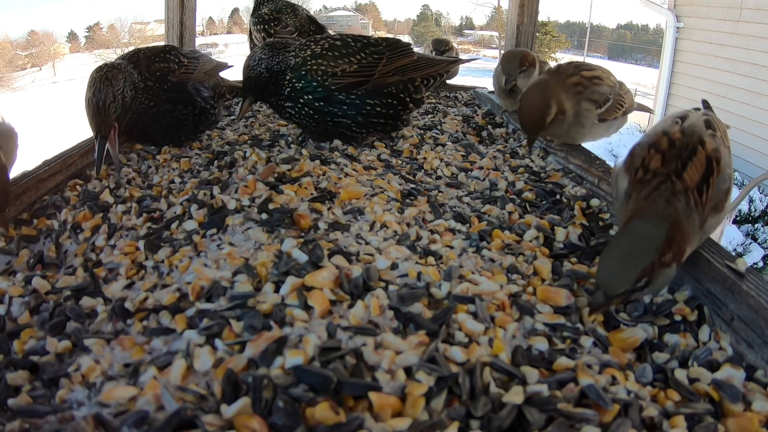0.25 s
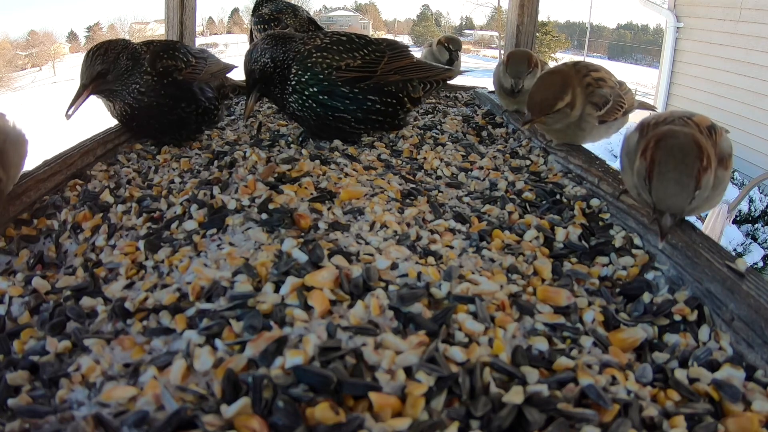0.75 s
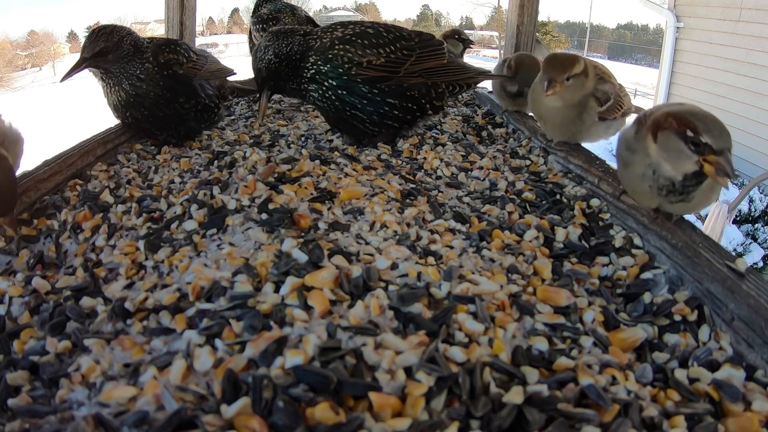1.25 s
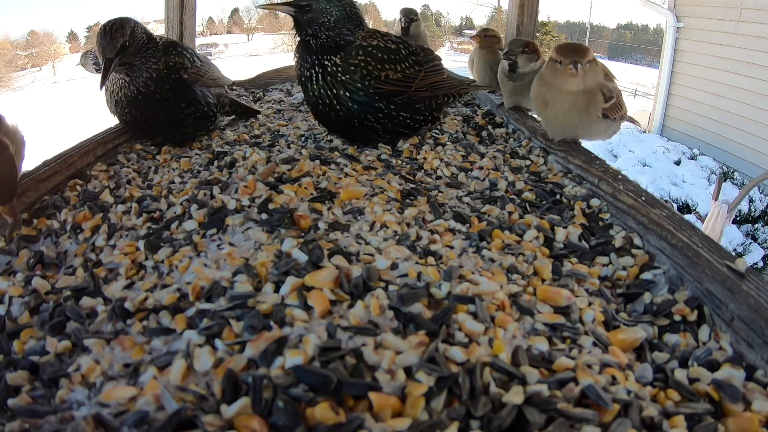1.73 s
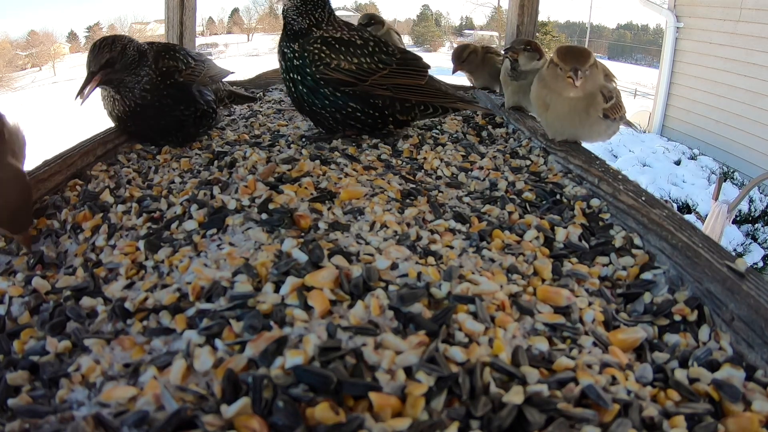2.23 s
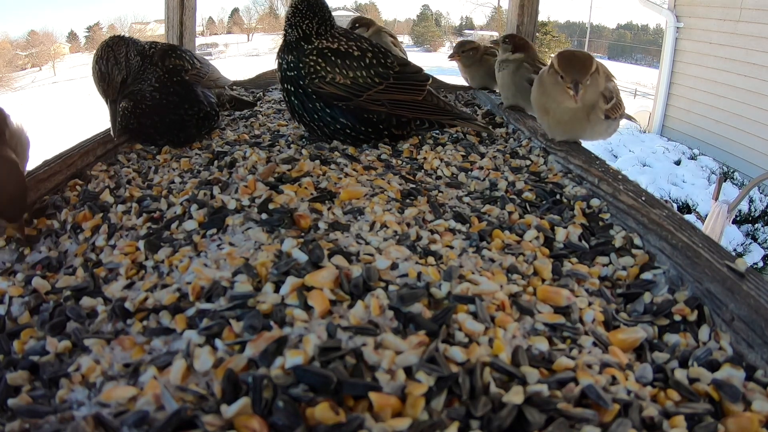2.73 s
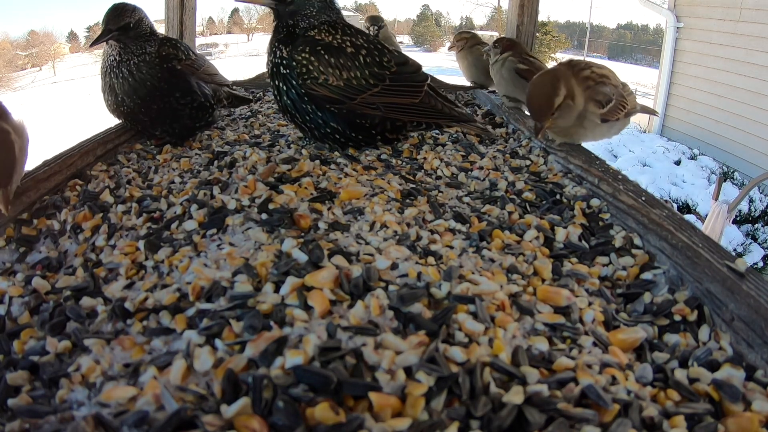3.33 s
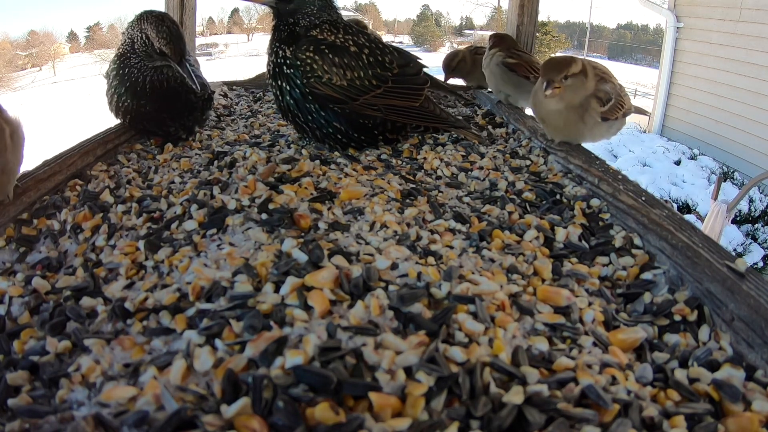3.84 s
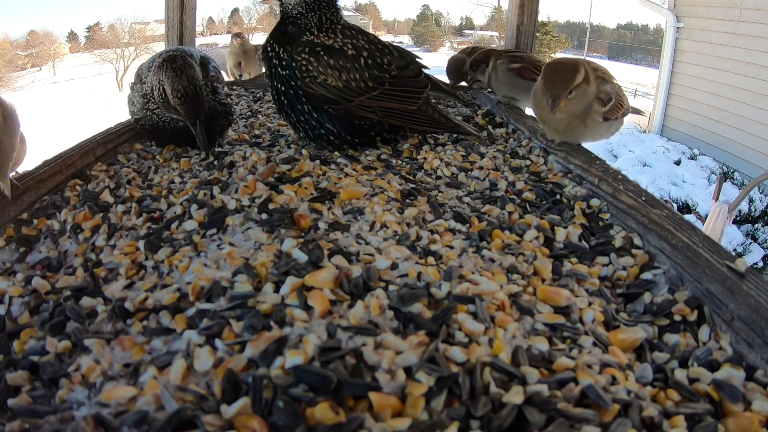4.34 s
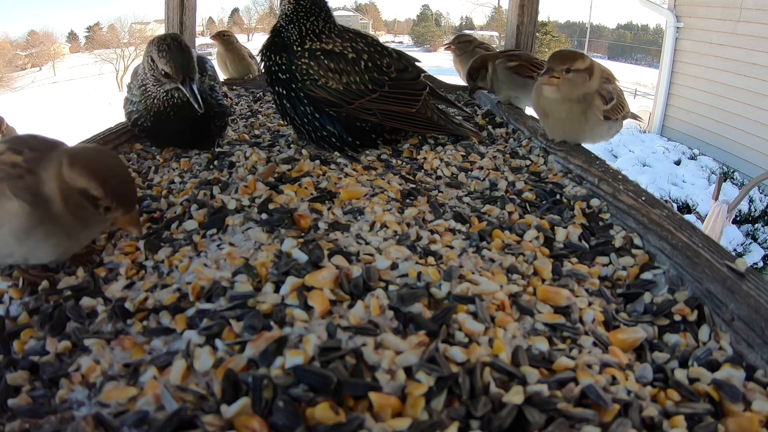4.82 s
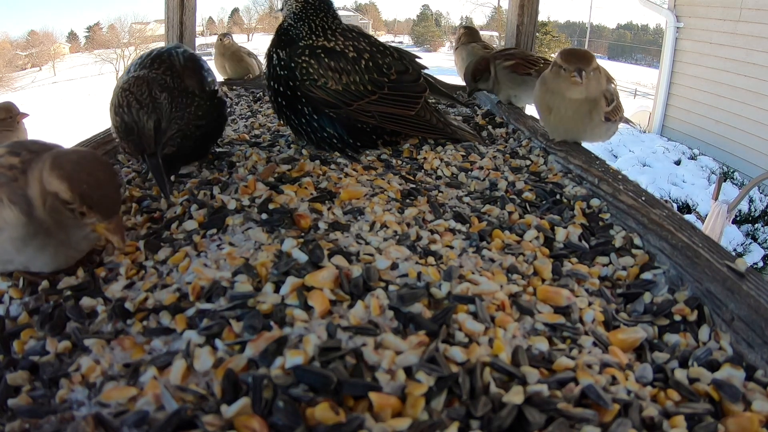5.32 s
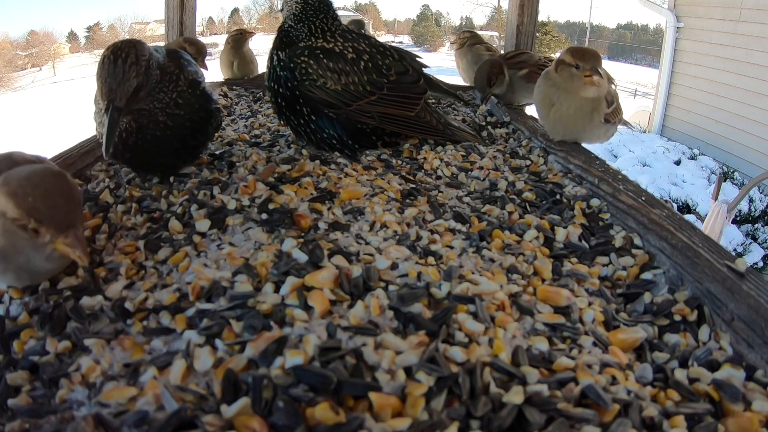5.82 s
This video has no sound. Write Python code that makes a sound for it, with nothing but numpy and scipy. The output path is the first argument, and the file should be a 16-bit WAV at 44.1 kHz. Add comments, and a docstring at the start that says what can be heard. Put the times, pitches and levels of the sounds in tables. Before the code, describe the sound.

Close, dry sound of birds at a feeder: hollow wood taps, little brittle cracks and seeds shifting in clumps. Low wing puffs flutter on the right at the start, a strong cluster of bumps follows before two seconds, then calmer pecking. Brief thin chirps and a small whistle stay quiet behind. Light wind rumbles low, and after five seconds a hard snap precedes a deep puff of air at the right microphone.

```python
"""A wooden seed tray outdoors, heard through two microphones mounted on it while small birds feed.
Hops and pecks excite the damped modes of the tray, which shake the microphones mostly in opposite sense.
Husks snap as resonant noise bursts, and sliding seed rustles as clumped ticks over filtered noise. Sparrows
chirp nearby as gliding sines, with hoarse noise notes and faint hiss behind. Light wind and a few puffs of
wing air add low-frequency pressure swings, mainly at the right microphone."""
import sys
import numpy as np
from scipy import signal
from scipy.fft import rfft, irfft, next_fast_len
from scipy.io import wavfile
from scipy.ndimage import uniform_filter1d, map_coordinates

SR = 44100
rng = np.random.default_rng(int(sys.argv[2]) if len(sys.argv) > 2 else 0)


def transcribe(signal):
    """Save signal, clipped to [-1, 1], as a 16-bit WAV file at the path in sys.argv[1]."""
    frames = np.atleast_2d(signal).T
    limited = np.clip(frames, -1, 1)
    pcm = np.round(limited * 32767).astype(np.int16)
    wavfile.write(sys.argv[1], SR, pcm)


N = 267687  # samples


def amp(db):
    """Decibel law: a level in dB becomes an amplitude factor."""
    return 10 ** (np.asarray(db) / 20)


def unit(x):
    """Energy normalization: scale to rms 1."""
    return x / np.sqrt(np.mean(x ** 2) + 1e-20)


def along(points, hz):
    """Logarithmic pitch scale: interpolate (Hz, value) points evenly in log frequency."""
    f, v = np.transpose(points)
    return np.interp(np.log(hz + 1), np.log(f + 1), v)


def curves(rows):
    """Piecewise-linear envelopes: one value per sample for each column after the time."""
    s, *cols = np.transpose(rows)
    return [np.interp(np.arange(N) / SR, s, c) for c in cols]


def wobble(rate, count=N):
    """Slow random modulation: a smooth curve through `rate` random knots a second."""
    knots = rng.standard_normal(int(count * rate / SR) + 4)
    return map_coordinates(knots, [np.arange(count) * rate / SR])


def filtered(x, response):
    """Linear filtering: multiply the spectrum of x by a complex response of frequency."""
    count = x.shape[-1]
    padded = next_fast_len(count + min(count // 2, 8192), True)  # room for the ringing
    spectrum = rfft(x, padded) * response(np.fft.rfftfreq(padded, 1 / SR))
    return irfft(spectrum, padded)[..., :count]


def resonance(hz, centre_hz, width_hz):
    """Damped simple resonator: complex response with gain 1 at its centre."""
    return 1j * hz * width_hz / (centre_hz ** 2 - hz ** 2 + 1j * hz * width_hz)


def sides(pan_db):
    """Interaural level difference: left and right gains, left over right by pan_db."""
    return amp(np.array([pan_db / 2, -pan_db / 2]))


# Correlation of diffuse sound between the microphones; values are limited to -1..1 when used.
# Columns: pitch_hz [Hz], left_right_likeness [correlation]
LIKENESS = [(900, -1.12), (1300, -0.4), (1900, -0.35), (2700, 0.33), (4000, 0.77), (5700, 0.12),
            (7000, -0.031), (9000, 0.033)]


def spread(pair, spectrum, patchy_db):
    """Partial coherence: mix two unrelated signals into a left and a right of rms 1, patchy in colour."""
    z = signal.stft(pair, nperseg=128)[2]
    field = uniform_filter1d(rng.standard_normal(z.shape[1:]), size=3, axis=0)  # over frequency
    field = uniform_filter1d(field, size=6, axis=1)  # over time
    pair = signal.istft(z * amp(patchy_db * unit(field)), nperseg=128)[1][:, :N]

    def mid_side(hz):
        turn = np.arccos(np.clip(along(LIKENESS, hz), -1, 1)) / 2
        return amp(along(spectrum, hz)) * [np.cos(turn), np.sin(turn)]
    mid, side = filtered(pair, mid_side)
    return unit(np.array([mid + side, mid - side]))


def add(out, s, sound):
    """Superposition: add a stereo sound from time s in seconds."""
    i = max(round(s * SR), 0)
    out[:, i:i + sound.shape[1]] += sound[:, :N - i]


# Spectrum of the steady outdoor hiss. Columns: pitch_hz [Hz], relative_density_db [dB per Hz]
AIR_SPECTRUM = [(300, -23.5), (800, 3), (1300, -16.5), (3000, -9), (7000, -2), (9000, -12.5),
                (12000, -19.5), (16000, -43)]


def air():
    """Stationary noise: the quiet hiss under everything."""
    return amp(-75.5) * spread(rng.standard_normal((2, N)), AIR_SPECTRUM, patchy_db=-2.0)


# Course of the wind. Columns: start_s [s], tray_sway_level_db [dB], buffet_level_db [dB]
WIND_COURSE = [(0.0, -64, -34), (0.17, -48, -38), (0.59, -34.5, -41), (0.86, -48, -46), (1.11, -44, -52),
               (1.5, -37.5, -39.5), (1.72, -31.5, -34), (2.13, -40, -53.5), (2.38, -59, -50.5),
               (2.47, -46.5, -43), (3.09, -72, -57), (3.72, -77, -61.5), (3.87, -40.5, -51.5),
               (4.41, -65.5, -48), (4.75, -39, -49), (5.26, -46.5, -45.5), (5.38, -35.5, -42.5),
               (5.82, -52, -48), (5.9, -41.5, -42.5), (6.07, -32.5, -53)]
# Spectrum of the buffeting. Columns: pitch_hz [Hz], relative_density_db [dB per Hz]
BUFFET_SPECTRUM = [(15, -28), (30, -18), (45, -6), (100, -8), (150, -13.5), (250, -15), (500, -35),
                   (900, -120)]
# Puffs of air. Columns: middle_s [s], right_peak_db [dB], pitch_hz at the middle [Hz], length_s [s]
AIR_PUFFS = [(0.022, -33.5, 110, 0.04), (0.136, -26, 100, 0.016), (0.247, -27.5, 118, 0.013),
             (0.348, -29, 100, 0.016), (0.394, -25, 90, 0.016), (0.181, -20, 83, 0.038),
             (0.561, -29, 79, 0.027), (2.493, -28.5, 84, 0.023), (4.576, -29, 90, 0.0084),
             (4.827, -27, 72.4, 0.06), (5.323, -20, 128, 0.0073), (5.351, -16, 98.5, 0.019),
             (5.384, -14.5, 190, 0.0044), (5.391, -8.5, 96, 0.014), (5.4, -23.5, 176, 0.038),
             (5.981, -29.5, 78, 0.028)]
PUFF_LEFT_DB = -19  # left relative to right


def wind():
    """Turbulent pressure: buffeting differs from port to port; a puff is a few cycles of low pressure swing."""
    lumps = amp(5.3 * np.array([wobble(18), wobble(18)]))
    buffet = unit(filtered(lumps * rng.standard_normal((2, N)), lambda f: amp(along(BUFFET_SPECTRUM, f))))
    out = amp(curves(WIND_COURSE)[1]) * sides(-4.5)[:, None] * buffet
    t = np.arange(-SR // 10, SR // 10) / SR
    for s, db, hz, length in AIR_PUFFS:
        swell = amp(db) * np.exp(-(2 * t / length) ** 2)
        swing = -np.cos(2 * np.pi * hz * t * (1 - 6 * t))  # falling pitch
        add(out, s - .1, swell * swing * amp([[PUFF_LEFT_DB], [0]]))
    return out


# Faint notes from farther birds. Columns: middle_s [s], pitch_hz [Hz], level_db [dB], length_s [s]
HOARSE_NOTES = [(1.836, 2280, -56, 0.043), (1.905, 2170, -59.5, 0.072), (1.93, 2200, -64, 0.02),
                (2.63, 5700, -54, 0.018), (3.023, 2000, -72.5, 0.42), (5.317, 1670, -71.5, 0.2)]


def hoarse():
    """Source-filter voice: breathy notes made of noise in one throat resonance."""
    out, t = np.zeros((2, N)), np.arange(-SR // 5, SR // 5) / SR
    for s, hz, db, length in HOARSE_NOTES:
        broken = amp(1.7 * wobble(90, count=len(t)))
        breath = rng.standard_normal(len(t))
        voice = unit(broken * filtered(breath, lambda f: resonance(f, hz, 500) ** 2))
        swell = np.exp(-(2 * t / length) ** 2)
        add(out, s - .2, amp(db) * swell * voice * np.ones((2, 1)))
    return out


# Sparrow chirps, one row a voice; a sparrow sings two lines at once.
# Columns: level_db [dB], glide as a list of (start_s [s], pitch_hz [Hz])
CHIRP_VOICES = [(-57.5, [(1.26, 6260), (1.272, 6350), (1.296, 6150), (1.308, 5900), (1.318, 5780),
                (1.328, 5630)]), (-63, [(3.2, 5250), (3.207, 5400), (3.24, 5950), (3.25, 5400),
                (3.262, 5060), (3.287, 4380), (3.306, 3700), (3.322, 3550), (3.338, 2830)]),
                (-63, [(3.2, 4850), (3.21, 4950), (3.24, 4850), (3.254, 4880)]), (-63.5, [(5.58, 5300),
                (5.592, 6150), (5.602, 6360), (5.63, 5800), (5.655, 5200)]), (-64.5, [(5.579, 4950),
                (5.593, 5630), (5.625, 5250), (5.645, 4900), (5.675, 4560), (5.688, 4350), (5.7, 3800)])]
# Thin low whistles. Columns: level_db [dB], glide as a list of (start_s [s], pitch_hz [Hz])
LOW_WHISTLES = [(-58.5, [(1.642, 2120), (1.662, 2510), (1.7, 2625), (1.748, 2720), (1.756, 2555),
                (1.785, 2620), (1.812, 2560)]), (-68, [(2.488, 920), (2.5, 980), (2.525, 960)])]
CALL_ATTACK_S, CALL_RELEASE_S, CALL_DB_PER_OCTAVE = 0.0036, 0.0091, 7


def calls():
    """Frequency modulation: slightly unsteady sines that fade as they fall, with a short outdoor echo."""
    out, t = np.zeros((2, N)), np.arange(SR // 4) / SR
    # voice, pan dB, level warble dB, relative pitch jitter
    voices = ([(call, -5, 4.5, .017) for call in CHIRP_VOICES]
              + [(call, -2, 2.5, .004) for call in LOW_WHISTLES])
    for (db, rows), pan_db, warble_db, jitter in voices:
        s, pitch = np.transpose(rows)
        hz = np.interp(t + s[0], s, pitch)
        time_left = s[-1] - s[0] - t
        gate = np.clip(np.minimum(t / CALL_ATTACK_S, time_left / CALL_RELEASE_S), 0, 1)
        unsteady_hz = hz * (1 + jitter * wobble(245, count=len(t)))
        tone = np.sqrt(2) * np.sin(2 * np.pi * np.cumsum(unsteady_hz) / SR)
        level_db = db + CALL_DB_PER_OCTAVE * np.log2(hz / pitch.max()) + warble_db * wobble(172, count=len(t))
        add(out, s[0], sides(pan_db)[:, None] * amp(level_db) * gate * tone)
    tail = rng.standard_normal((2, len(t))) * amp(-60 * t / 0.15)  # diffuse echo, 0.15 s to fall 60 dB
    echo = signal.oaconvolve(out, tail / np.linalg.norm(tail[0]), axes=1)[:, :N]
    return out + amp(-1.5) * echo


# Course of the sliding seed. Columns: start_s [s], fine_level_db [dB], coarse_level_db [dB]
SLIDING = [(0.0, -65.5, -69), (0.59, -61.5, -67), (1.11, -68.5, -74), (1.43, -60, -64.5),
           (1.81, -56.5, -59), (2.06, -66, -71.5), (4.31, -62, -68), (4.92, -68.5, -78.5),
           (6.07, -66, -69.5)]
# Beaks sweep through the seed. Columns: middle_s [s], fine_level_db [dB], coarse_level_db [dB], length_s [s]
BEAK_SWEEPS = [(0.217, -63, -65, 0.05), (1.298, -57.5, -66, 0.12), (1.72, -57, -59, 0.063),
               (1.877, -77, -65, 0.11), (2.164, -55, -61, 0.013), (2.666, -56.5, -73, 0.082),
               (2.94, -81, -75, 0.038), (3.186, -64, -69, 0.1), (3.619, -57.5, -65, 0.053),
               (4.32, -79, -66.5, 0.17), (5.24, -71, -71.5, 0.19), (5.79, -55.5, -66, 0.12)]
# Spectra of fine and coarse rustle. Columns: pitch_hz [Hz], relative_density_db [dB per Hz]
FINE_SPECTRUM = [(3000, -14), (4500, -11), (5800, -1.5), (7000, 2.5), (7600, -0.5), (8300, -17),
                 (10000, -25), (12500, -34), (14500, -41), (16500, -53)]
COARSE_SPECTRUM = [(500, -23), (900, 3.5), (1400, 3.5), (2500, -1.5), (4000, -1), (5500, -7), (9000, -27.5)]
THROWN_S, THROWN_FINE_DB = 0.009, -16  # spray of seed after a hop: time to its peak, fine over coarse


def rustle():
    """Granular friction: clumps of tiny ticks over a soft hiss; every sweep or hop is a swell of it."""
    t = np.arange(N) / SR
    level = amp(curves(SLIDING))
    for s, *_, seed_db in TRAY_HOPS:  # the spray starts at once and thins out
        near = slice(round(s * SR), round((s + .15) * SR))
        age = (t[near] - s) / THROWN_S
        level[:, near] += amp([[seed_db + THROWN_FINE_DB], [seed_db]]) * np.e * age * np.exp(-age)
    for s, fine_db, coarse_db, length in BEAK_SWEEPS:
        near = slice(max(round((s - 2 * length) * SR), 0), round((s + 2 * length) * SR))
        level[:, near] += amp([[fine_db], [coarse_db]]) * np.exp(-(2 * (t[near] - s) / length) ** 2)
    clump = wobble(45)  # shared by fine and coarse

    def grainy(rate, tick_db, clump_db):
        """Shot noise: random ticks, `rate` a second, swell a hiss."""
        tick_level_db = tick_db + 3.0 * np.minimum(rng.exponential(size=N), 2.6)
        ticks = (rng.random(N) < rate / SR) * amp(tick_level_db)
        ticks = signal.lfilter([1], [1, -np.exp(-1 / (0.0015 * SR))], ticks)  # decay constant 1.5 ms
        clumps = amp(clump_db * clump + 1.65 * wobble(70))
        return rng.standard_normal((2, N)) * (1 + ticks) * clumps
    fine = spread(grainy(rate=150, tick_db=1.5, clump_db=2.0), FINE_SPECTRUM, patchy_db=2.0)
    coarse = spread(grainy(rate=150, tick_db=-14.5, clump_db=2.2), COARSE_SPECTRUM, patchy_db=3.5)
    return level[0] * sides(0.39)[:, None] * fine + level[1] * coarse


# Snapping husks. Columns: start_s [s], peak_level_db before panning [dB], husk_pitch_hz [Hz],
# husk_ring_over_crack_db [dB], crumble_t60_s [s]
HUSK_SNAPS = [(0.0939, -40.5, 1480, -4, 0.045), (0.124, -40.5, 2920, -7, 0.027),
              (0.167, -55, 3000, -14, .01), (0.2174, -47, 2640, -20, 0.019), (0.242, -46, 3150, 8, 0.02),
              (0.4077, -34, 1960, -2.5, 0.031), (0.4399, -31.5, 3520, -10, 0.017),
              (0.457, -44, 2120, -2, 0.041), (0.488, -40, 1390, -9.5, 0.048),
              (0.5201, -35.5, 3670, -5.5, 0.033), (0.606, -44.5, 2240, -1, 0.047),
              (0.645, -38, 4060, 8, 0.078), (0.647, -48.5, 1670, -7, .05), (0.684, -48, 1960, -4, 0.035),
              (0.748, -45, 3000, -7, 0.011), (0.838, -38, 3520, -8.5, 0.038),
              (0.906, -39.5, 4180, -14, 0.069), (1.037, -49, 1870, 4, 0.016),
              (1.068, -51.5, 4300, -5, 0.024), (1.146, -53.5, 4000, -23, 0.014),
              (1.173, -45.5, 2880, 1, 0.021), (1.199, -45, 3950, -25, 0.029),
              (1.2139, -32.5, 3960, -14.5, 0.016), (1.229, -22, 4170, -6, 0.014),
              (1.246, -27, 4740, -4, 0.016), (1.3355, -44, 3300, -18, 0.018), (1.452, -64, 3500, -18, .03),
              (1.486, -33, 3500, -18, 0.0072), (1.562, -48, 2300, 4, 0.037), (1.594, -41, 2190, 12, 0.037),
              (1.609, -37.5, 1570, 2, 0.035), (1.641, -33, 2380, -4, 0.055), (1.685, -40, 2000, -11, 0.024),
              (1.697, -45, 2000, -18, 0.013), (1.707, -30, 1990, -14.5, 0.012),
              (1.724, -32.5, 2600, -16, 0.014), (1.738, -34.5, 1790, 5, 0.07),
              (1.8387, -44, 2280, 10, 0.053), (1.97, -36.5, 2260, -9, 0.019), (1.9929, -35, 2090, 4, 0.017),
              (2.129, -57, 3500, -19, .015), (2.151, -40, 3770, -10.5, 0.036),
              (2.2374, -37, 3730, -7.5, 0.02), (2.299, -41, 3260, -11, 0.017),
              (2.317, -49, 3300, -10, .015), (2.331, -51, 3300, -8, .015), (2.4334, -39.5, 3650, -2, 0.026),
              (2.452, -54, 3500, -20, 0.014), (2.497, -37, 4000, -4, 0.0099),
              (2.523, -33.5, 1820, -11, 0.025), (2.559, -47, 1700, -5, .02), (2.665, -43.5, 2500, 3, 0.021),
              (2.6906, -37, 3170, 1, 0.015), (2.78, -42, 4200, -10, 0.011), (2.885, -46.5, 3200, 1, 0.03),
              (2.8944, -42.5, 1330, 10, 0.021), (2.9324, -45, 2320, 5, 0.04),
              (3.017, -49.5, 3500, -20, 0.022), (3.085, -25, 3600, -8.5, 0.011),
              (3.3762, -42, 2490, -22, 0.016), (3.488, -49, 3000, -25, 0.022),
              (3.558, -50.5, 2500, -4, .025), (3.588, -49, 3000, -12, 0.013),
              (3.629, -40, 2360, -18, 0.039), (3.68, -51, 3500, -27, 0.012), (3.7748, -44, 1370, -8, 0.02),
              (3.83, -37.5, 1880, -13, 0.027), (3.85, -44, 1690, -2, .06), (3.878, -36, 3450, -5, 0.03),
              (3.9691, -37, 3660, -5, 0.014), (4.161, -49.5, 3000, -6.5, 0.032),
              (4.304, -48, 2970, 0, 0.029), (4.35, -46, 2920, -1, 0.054), (4.4, -34.5, 3100, -16, 0.022),
              (4.475, -41.5, 1950, 0, 0.075), (4.529, -54, 3000, -22, .02), (4.641, -49, 3000, -26, 0.015),
              (4.662, -44, 2760, -8, 0.023), (4.6895, -43.5, 2860, -28, 0.018),
              (4.743, -49, 3000, -23, 0.016), (4.761, -48, 3700, 0, 0.056), (4.846, -56, 3500, 13, 0.02),
              (4.895, -38, 3650, -14, 0.012), (4.9395, -41.5, 2450, -5, 0.023),
              (5.025, -52, 3500, -15, 0.011), (5.102, -34.5, 3580, -11.5, 0.012),
              (5.254, -44, 5050, -3, .01), (5.2536, -21, 2670, -8, 0.018), (5.3737, -49.5, 1540, -22, .015),
              (5.43, -56, 2200, -26, .015), (5.63, -59, 3560, -4, 0.013), (5.696, -38, 3810, -19, 0.011),
              (5.7128, -46.5, 3600, 2, .02), (5.739, -31, 4080, -14, 0.0047), (5.801, -42, 2110, 8, 0.074),
              (5.821, -40, 2720, -9, 0.022), (5.903, -46.5, 2700, -19, 0.023), (5.921, -48, 3600, 8, .015),
              (5.9436, -50, 2910, -16, 0.033), (5.959, -29.5, 3730, -9, 0.013),
              (6.041, -56, 2120, -22, 0.016), (6.059, -39.5, 1670, -9, 0.048)]
# Cavity before the microphones. Columns: pitch_hz [Hz], width_hz of one resonator [Hz], level_db [dB]
PORT_CAVITY = [(7006, 545, -3.5), (6450, 1570, 1)]
HUSK_Q, SNAP_TOP_DB, SNAP_LEFT_DB = 2.5, -25, 2  # husk resonator sharpness, level near 11 kHz, left over right
SNAP_PAN_SCATTER_DB, SNAP_LAG_S = 2, .00004  # husks lie left and right of the ports
CRUMBLE_DB, CRUMBLE_LUMPY_DB, BROAD_DB = -8, 4.5, -7  # tail under the crack, its unevenness, broad husk shoulder


def snaps():
    """Impulsive fracture: a sharp crack with a short noisy tail rings in the husk and in the port cavity."""
    out, t = np.zeros((2, N)), np.arange(SR // 16) / SR

    def port(f):
        return sum(amp(db) * resonance(f, hz, width) ** 2 for hz, width, db in PORT_CAVITY)
    for s, db, husk_hz, husk_db, t60 in HUSK_SNAPS:
        shared, *own = rng.standard_normal((3, len(t)))
        lumpy_db = CRUMBLE_LUMPY_DB * wobble(580, count=len(t))
        crumble = amp(CRUMBLE_DB + lumpy_db - 60 * t / np.clip(t60, .004, .09))
        env = amp(-60 * t / 0.0048) + crumble + 0.013 * amp(-60 * t / 0.21)  # crack, crumble, faint long tail
        burst = env * (1 - np.exp(-t / 0.00054))
        place = rng.standard_normal()  # positive lies to the left

        def colour(f):
            husk = amp(husk_db) * resonance(f, husk_hz, husk_hz / HUSK_Q) ** 2
            broad = amp(husk_db + BROAD_DB) * resonance(f, 0.68 * husk_hz, 0.72 * husk_hz) ** 2
            top = amp(SNAP_TOP_DB) * resonance(f, 10470, 12000) ** 2
            return (port(f) + husk + broad + top) / (1 + (f / 13500) ** 12)

        def lag(f):
            return np.exp(1j * np.pi * f * SNAP_LAG_S * place * np.array([[1], [-1]]))
        # the nearer port hears the shared crack first; part of the sound reaches each port in its own way
        crack = (filtered(burst * shared, lambda f: colour(f) * lag(f))
                 + filtered(burst * np.array(own), lambda f: colour(f) * 0.56))
        gains = amp(db) * sides(SNAP_LEFT_DB + SNAP_PAN_SCATTER_DB * place)[:, None]
        add(out, s, gains * crack / np.abs(crack.mean(0)).max())
    return out


# Tray modes, lowest first. Columns: pitch_hz [Hz], t60_s [s] (hops ring for 0.54 of it),
# right_level_db [dB], left_over_right_db [dB], left_lead_rad [rad]
TRAY_MODES = [(46.86, 0.56, -2, -11, -1), (110, 0.048, -21.5, -30, 6.5), (157.2, 0.2, 1.5, -3, 3.5),
              (201.5, 0.17, 1.5, -6, 3.5), (258, 0.35, -3.5, -6.5, 4), (290, 0.078, -7.5, 5.5, -0.33),
              (331.2, 0.19, -7, -2.5, -1.5), (394, 0.13, -6.5, -10, 3.5), (471.6, 0.11, -4.5, -5.5, 3.5),
              (522, 0.1, -11, -0.5, 3.5), (637, 0.033, -8, -8.5, 3.5), (760.6, 0.032, -7.5, -1.5, 4),
              (858, 0.15, -14, 1, 3.5), (1035, 0.042, -17.5, -1, 3), (1310, 0.036, -6.5, -4.5, 3),
              (1660, 0.036, -13.5, 0, 1)]
# Hops and pecks. Columns: start_s [s], peak_level_db [dB], most_ringing_pitch_hz [Hz], hardness_db [dB],
# thrown_seed_level_db of the coarse part [dB]
TRAY_HOPS = [(0.096, -25.5, 394, 14, -53.5), (0.24, -36, 266, 19, -85), (0.41, -23.5, 352, 10, -75),
             (0.468, -35, 194, 12, -56), (0.647, -24.5, 345, 10, -66), (0.69, -19.5, 362, 0.5, -85),
             (0.841, -30, 288, 18.5, -60), (0.88, -25.5, 346, 8, -74), (1.158, -38.5, 254, -6, -65.5),
             (1.189, -32, 366, 12, -66), (1.379, -32.5, 194, 15, -85), (1.511, -22, 254, 2, -58.5),
             (1.598, -19, 340, 22, -56.5), (1.649, -17.5, 250, 0, -65), (1.696, -12.5, 201, 2.5, -59),
             (1.729, -22, 199, 9, -62.5), (1.947, -24, 250, 11.5, -58), (1.998, -17, 290, 9.5, -58.5),
             (2.345, -34, 253, 15, -87), (2.433, -28.5, 253, 8.5, -85), (2.518, -42, 328, 22, -80),
             (2.889, -30.5, 369, 11, -61), (3, -32, 248, -10, -79), (3.124, -30.5, 252, 4, -86),
             (3.555, -32.5, 280, 5.5, -70), (3.626, -25, 257, 14.5, -67.5), (3.764, -33, 260, 12, -70),
             (3.835, -21, 248, 14.5, -65), (3.876, -25, 235, 7, -73), (4.244, -27.5, 220, 10, -71),
             (4.378, -37, 286, 12, -70), (4.48, -21, 332, 11, -63), (4.538, -28.5, 256, 5, -85),
             (4.672, -33, 240, 7, -62.5), (4.771, -30, 400, 8, -64), (4.849, -26, 335, 5, -71),
             (4.94, -26, 340, 5, -63.5), (5.214, -30, 241, 1, -91), (5.805, -24.5, 330, 6, -55.5),
             (6.019, -41.5, 265, -13, -86)]
# Feet keep the tray trembling. Columns: start_s [s], level_db [dB]
FOOT_SHUFFLE = [(0.0, -50.5), (0.64, -47), (1.2, -52.5), (1.67, -45), (2.1, -52.5), (2.45, -49.5),
                (2.7, -52), (3.03, -46.5), (3.38, -51), (3.79, -49.5), (4.04, -50), (4.4, -49), (4.9, -51),
                (5.43, -51), (6.07, -53)]
# (Hz, dB) at the low end; hardness lifts the modes at HARD_HZ; (Hz, dB over hardness) at the high end
HOP_LOW, HARD_HZ, HOP_HIGH = (214, -3.3), 456, (1060, -23)
FOCUS_DB, FOCUS_OCTAVES = 7.5, 0.14  # extra ring near the pitch


def tray():
    """Modal vibration: hops strike the modes, shuffling feet drive the middle ones, wind rocks the lowest."""
    hz, t60, db, left_db, lead = np.transpose(TRAY_MODES)[:, 1:, None]  # hops leave the lowest mode out
    out, t = np.zeros((2, N)), np.arange(SR // 2) / SR
    chances = rng.standard_normal((len(TRAY_HOPS), 2, len(hz), 1))  # strength and phase of each mode
    for (s, peak_db, pitch_hz, hard_db, _), chance in zip(TRAY_HOPS, chances):
        high = (HOP_HIGH[0], hard_db + HOP_HIGH[1])
        colour_db = along([HOP_LOW, (255, 0), (340, 0), (HARD_HZ, hard_db), high], hz)
        colour_db = colour_db + FOCUS_DB * np.exp(-(np.log2(hz / pitch_hz) / FOCUS_OCTAVES) ** 2)
        swell = 1 - np.exp(-t * hz / 1.26)  # a soft foot: each mode needs a cycle or two to build up
        env = amp(db + colour_db + 3.63 * chance[0] - 60 * t / (0.54 * t60)) * swell
        phase = 2 * np.pi * hz * t + 0.93 * chance[1]
        left = (env * amp(left_db) * np.sin(phase + lead)).sum(0)
        ring = np.array([left, (env * np.sin(phase)).sum(0)])
        late = round(SR * (0.01197 + 0.02005 * rng.random()))  # the second foot lands a little later
        both = ring + 0.35 * np.pad(ring, ((0, 0), (late, 0)))[:, :len(t)]
        add(out, s - .0015, amp(peak_db) * both / np.abs(both).max())

    def driven(modes, lumpy_db, rate):
        """Forced vibration: uneven noise pushes each mode continuously."""
        push = rng.standard_normal((len(modes), N)) * amp(lumpy_db * wobble(rate))
        total = 0
        for p, (hz, t60, db, left_db, lead) in zip(push, modes):
            width_hz = np.log(1000) / np.pi / t60
            stereo = np.array([[amp(left_db) * np.exp(1j * lead)], [1]])

            def mode(f):
                soft = 1 + (f / (2.76 * hz)) ** 4  # feet are too soft to push far above a mode
                return amp(db) * resonance(f, hz, width_hz) * np.sqrt(t60) / soft * stereo
            total = total + filtered(p, mode)
        return unit(total)
    hz, _, _, left_db, lead = TRAY_MODES[0]
    sway_hz = hz * (1 + 0.072 * wobble(9))  # the sway wanders a little in pitch at random
    phase = 2 * np.pi * np.cumsum(sway_hz) / SR
    sway = amp(4.3 * wobble(21.975)) * np.array([amp(left_db) * np.sin(phase + lead), np.sin(phase)])
    tremble = driven(TRAY_MODES[1:-3], lumpy_db=2.5, rate=25)
    return out + amp(curves(FOOT_SHUFFLE)[0]) * tremble + amp(curves(WIND_COURSE)[0]) * unit(sway)


def scene():
    """Superposition: the sources add, from the background hiss to the tray."""
    return air() + wind() + hoarse() + calls() + rustle() + snaps() + tray()


TOP_HZ = 15800


def record(dry):
    """Band limiting: nothing passes from TOP_HZ upward."""
    return filtered(dry, lambda hz: hz < TOP_HZ)


dry = scene()
out = record(dry)
transcribe(out)
```